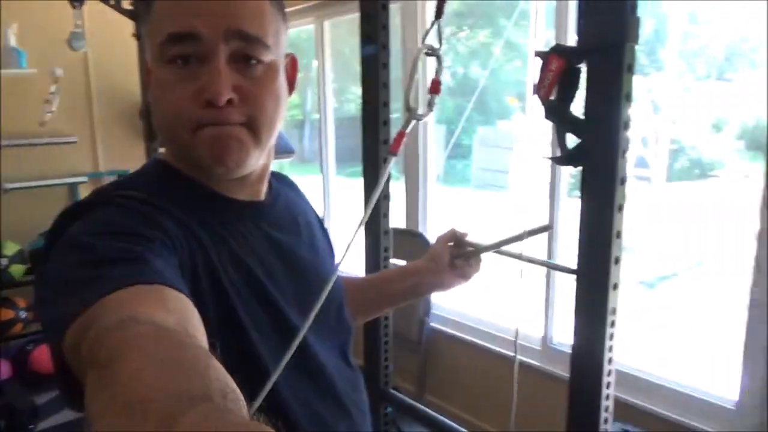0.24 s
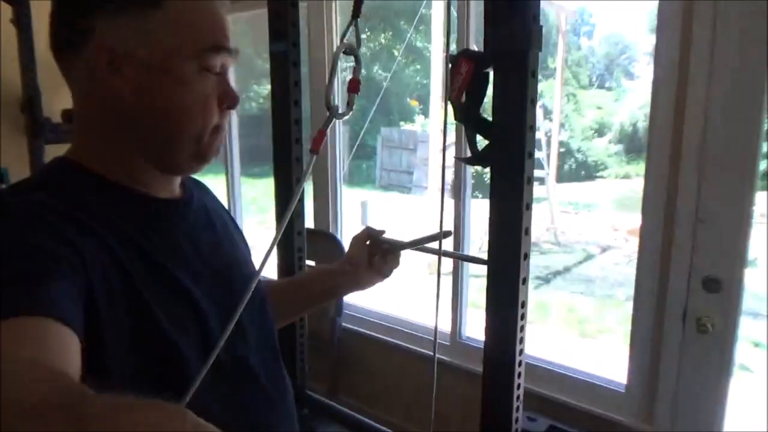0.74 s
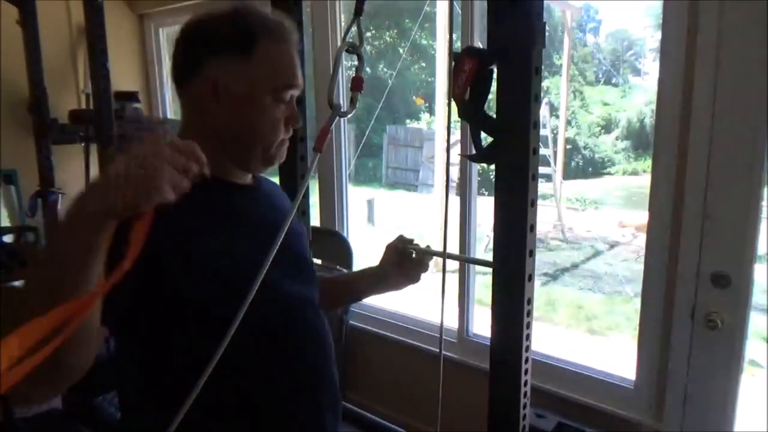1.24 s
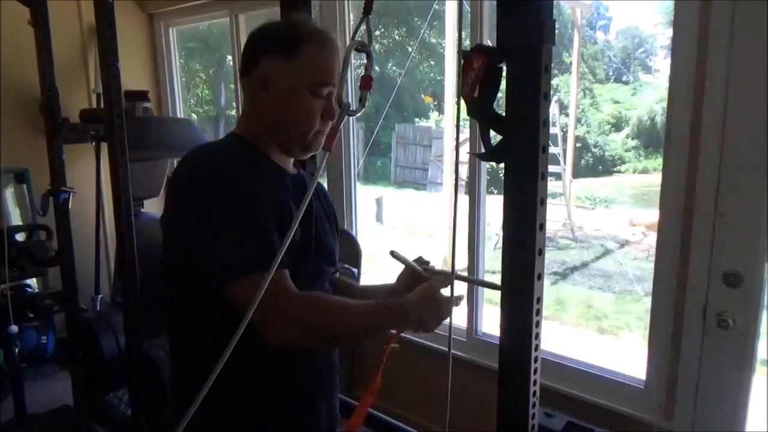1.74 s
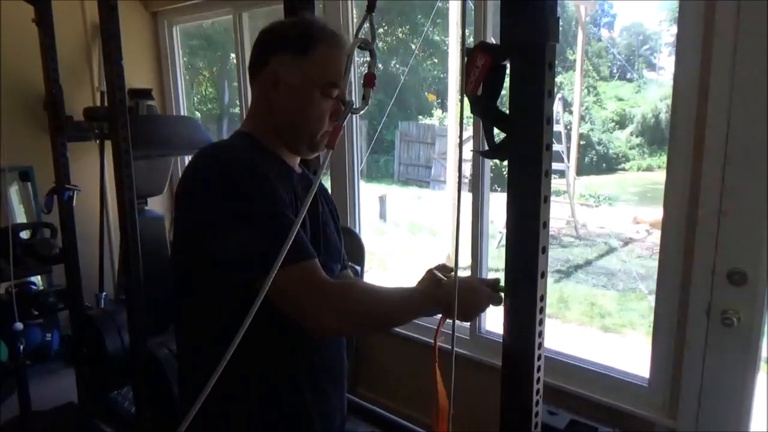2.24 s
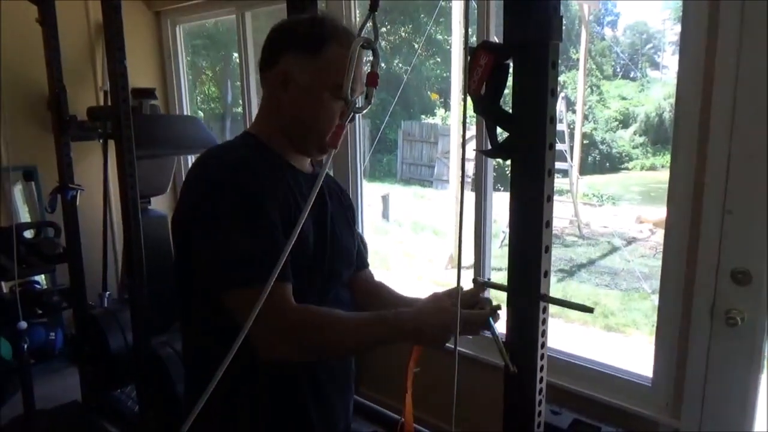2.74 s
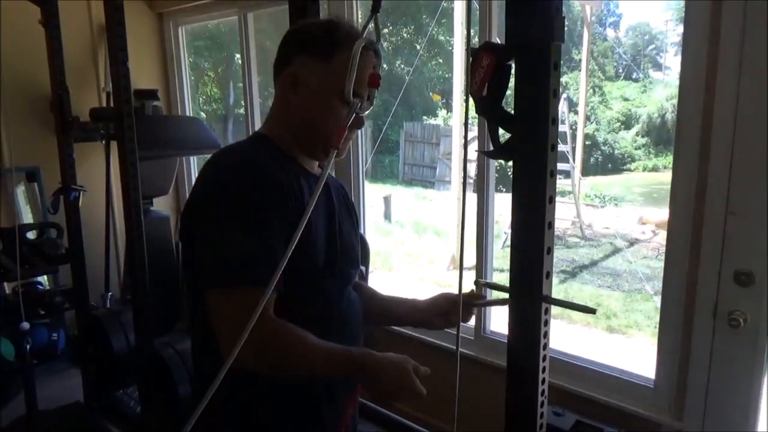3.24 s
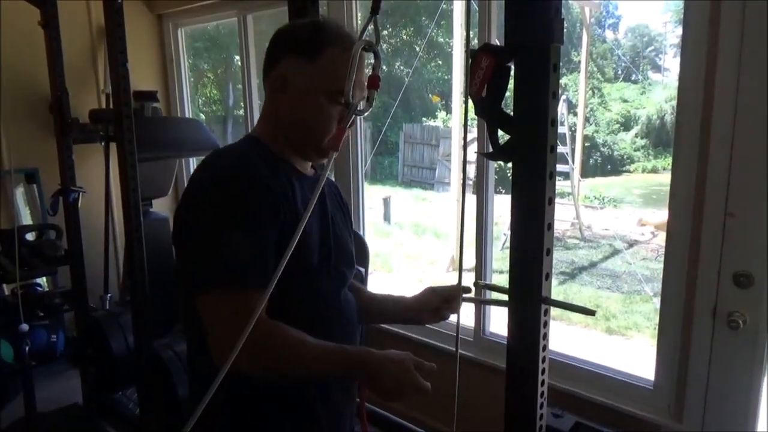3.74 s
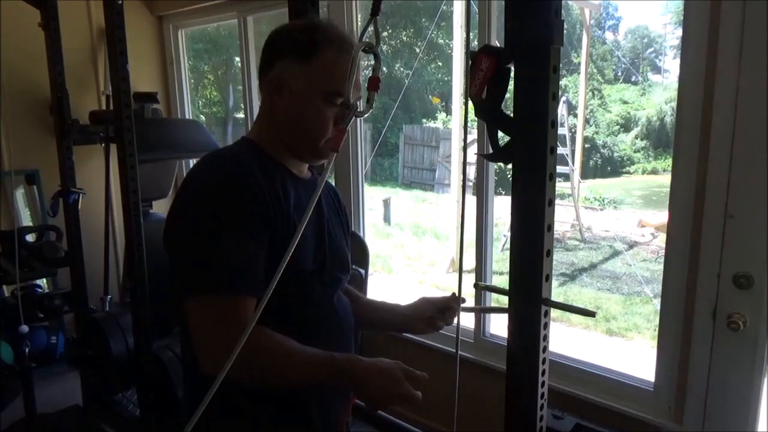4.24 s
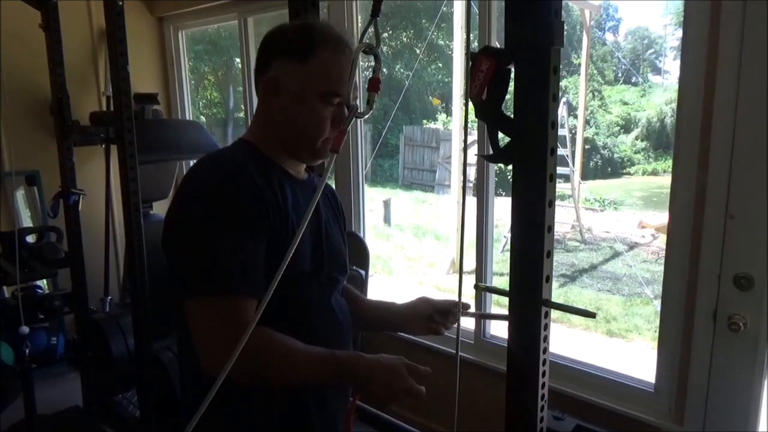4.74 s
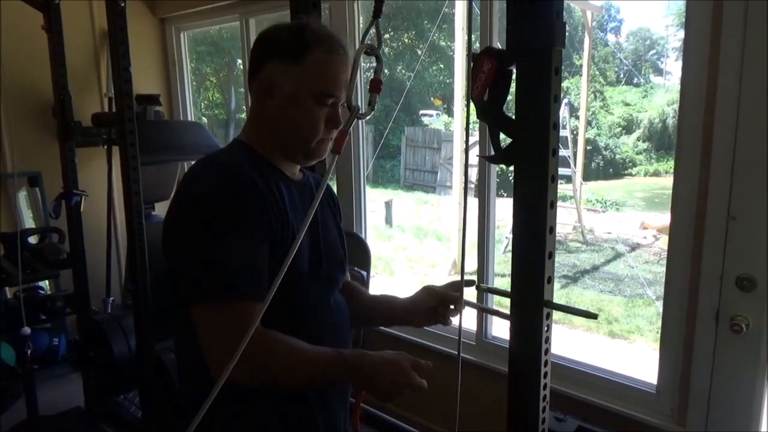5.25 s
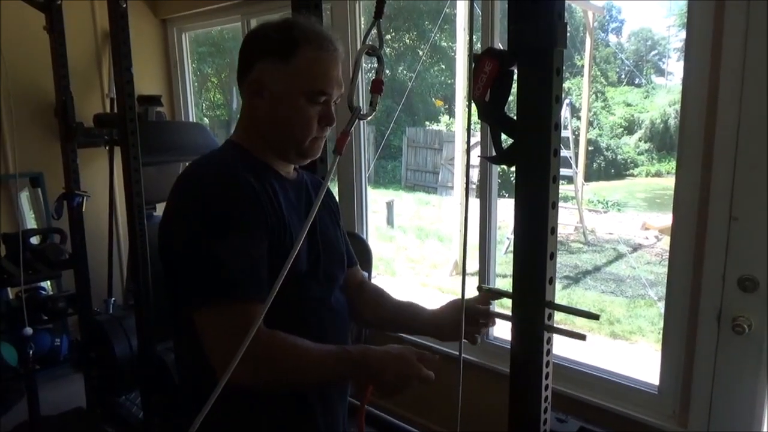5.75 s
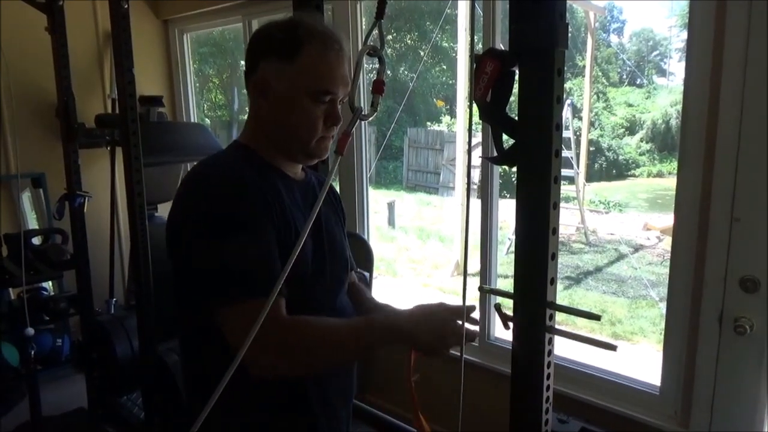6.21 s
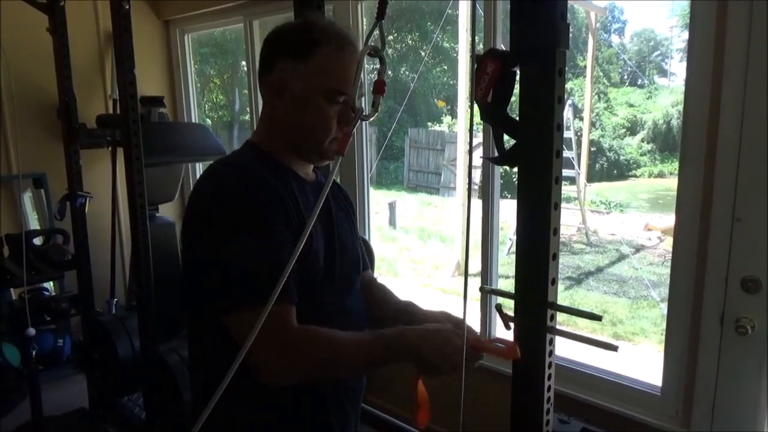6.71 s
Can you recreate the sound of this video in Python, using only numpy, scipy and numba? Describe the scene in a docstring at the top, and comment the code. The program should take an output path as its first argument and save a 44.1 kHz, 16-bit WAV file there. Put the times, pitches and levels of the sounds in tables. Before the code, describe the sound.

Low fan hum fills a hard-walled room. A double metal clank and a cluster of close, hollow plastic taps come first; then steel pegs strike and grate in the holes of a hollow rack post, one blow singing on with a high, pure ring. Clanks continue in small groups with gritty scrapes, thinning before six seconds, leaving light strap rustle and hum. The loudest hits sound squashed.

```python
"""A small, hard-walled gym hums with a low rush and two wavering fan tones; a nylon strap and sleeve brush in grains.
Steel pegs scrape along the holes of a hollow steel upright, in clumps of tiny slips that ring the steel.
From the first moments blows clank between scrapes: noise-driven wall modes plus decaying peg modes in the room.
Early on fingers click on a plastic case by the microphones; near three seconds a faint low tone bends up and back.
After the last blow and scrape the cloth brushes again over the hum. A limiter flattens the loudest sounds."""
import sys
import numpy as np
from scipy import signal
from scipy.fft import rfft, irfft
from scipy.io import wavfile
from scipy.ndimage import uniform_filter1d, minimum_filter1d
from numba import njit

SR = 44100
rng = np.random.default_rng(int(sys.argv[2]) if len(sys.argv) > 2 else 0)


def wav_record(signal):
    """Record a signal, one row per channel, as 16-bit PCM in the file named by sys.argv[1]."""
    frames = np.transpose(np.atleast_2d(signal))
    bounded = np.clip(frames, -1, 1)
    # unit amplitude maps onto the largest positive 16-bit level
    quanta = np.round(bounded * 32767).astype(np.int16)
    wavfile.write(sys.argv[1], SR, quanta)


N = 307576
TIME = np.arange(N) / SR  # seconds into the scene
AGE = TIME[:int(1.5 * SR)]  # seconds since a sound began

# Levels in all tables stand ahead of the limiter.
# Room rush, spectrum before its treble shelf: (frequency [Hz], relative density [dB])
RUSH_SPECTRUM = [(15, -34), (25, -17), (138, -1.5), (182, 1.5), (241, 3), (401, -7), (444, -2), (588, -12),
                 (651, -10), (930, -19), (1330, -17), (3080, -28.5), (4290, -68), (9200, -51), (11000, -43),
                 (14300, -68), (22000, -120)]
RUSH_DB = -44.5
# Wavering fan tones, of which the first two sound: (frequency [Hz], rms level [dB])
FAN_TONES = [(50, -65.5), (143, -57), (233, -52.5)]
# Reverberation of the gym: (frequency [Hz], time to fall 60 dB [s])
ROOM_T60 = [(200, 0.91), (1000, 0.57), (2000, 0.58), (5000, 0.48), (11000, 0.27)]

# Nylon strap and sleeve brushing: (start [s], length [s], level [dB])
BRUSHES = [(0.0, 0.12, -42.5), (0.725, 0.022, -44.5), (1.404, 0.24, -43.5), (6.09, 0.082, -49),
           (6.41, 0.049, -49.5), (6.7, 0.081, -54)]
# Hiss of the woven fibres: (frequency [Hz], relative density [dB])
CLOTH_SPECTRUM = [(600, 11.5), (2000, -1), (4000, 1), (7000, 1.5), (9500, 3.5), (11000, -2.5)]
BRUSH_RISE_S, BRUSH_FALL_SHARE = 0.045, 1  # swell time constant; fall time constant as a share of length
CLOTH_FLOOR_DB = -60  # steady faint hiss under and between brushes

# Pushes and pulls of a peg along its hole:
# (start [s], length [s], level before treble shelf [dB], treble shelf [dB])
SLIDES = [(0.0, 0.035, -54, -9), (1.0, 0.07, -40.5, -22), (2.045, 0.066, -28.5, -12),
          (2.352, 0.053, -20, -1), (2.467, 0.13, -35, 14.5), (3.62, 0.13, -36, 7.5),
          (3.786, 0.19, -42.5, 6), (4.495, 0.19, -42.5, -0.5), (4.782, 0.023, -27, 10),
          (4.935, 0.047, -33, 17), (5.272, 0.24, -37.5, -5), (5.58, 0.2, -33, 6.5),
          (5.734, 0.1, -32.5, 4.5), (5.874, 0.096, -29, -17), (6.002, 0.055, -34.5, 4.5)]
SLIDE_RISE_S, SLIDE_FALL_S = 0.029, 0.022  # time constants of the hand's push
# The hollow upright's crowd of wall modes: (frequency [Hz], relative density [dB])
UPRIGHT_SPECTRUM = [(100, -47), (350, -12), (700, -5), (1050, -6.5), (1450, -0.5), (1900, 3), (2500, -3),
                    (3300, -0.5), (4050, -8), (4900, -4.5), (5800, -6.5), (8000, -7.5), (9600, -12),
                    (11000, -21)]
# Bending modes of a free peg: (frequency [Hz], relative level [dB], time to fall 60 dB [s])
PEG_MODES = [(1784, -2, .25), (1792, 0, .3), (1820, -3, .8), (1855, -7, .3), (1928, -10, .2),
             (1981, -8, .7), (2799, -16, .15), (3698, -22, .4), (4296, -19, .1), (4910, -20, .1),
             (6530, -25, .15)]
# A peg that bears on the wall of its hole: (frequency [Hz], relative level [dB], time to fall 60 dB [s])
SEATED_MODES = [(1660, -10, .12), (1702, 0, .3), (1770, -8, .15), (1860, -12, .4), (1940, -13, .3),
                (2041, -9, .45), (2185, -12, .45), (2368, -11, .2), (4942, -19, .15), (5017, -22, .15),
                (5440, -27, 1.1), (7467, -20, .15), (8677, -25, .15), (10347, -29, .15)]
# Bright modes woken by a hard knock on the end: (frequency [Hz], relative level [dB], time to fall 60 dB [s])
CHIME_MODES = [(1389, -23, .4), (2713, -14, .15), (3601, 0, .3), (3704, -8, .15), (3790, -10, .12),
               (4261, -11, .1), (4820, -10, .1), (4950, -9, .12), (7005, -13, .15), (10610, -26, .1)]
# A peg left hanging free sings on: (frequency [Hz], relative level [dB], time to fall 60 dB [s])
FREE_NOTE = [(3601, 0, 1.25)]

# Steel on steel; the ring columns are relative to the blow's level and scatter from mode to mode:
# (time [s], level [dB], bass shelf [dB], treble shelf [dB], contact resonance [Hz],
#  peg ring [dB], seated-peg ring [dB], chime [dB])
BLOWS = [(0.044, -16.5, -7, 3, 4650, 3, -37, -16), (0.097, -21.5, -8, -3.5, 3000, 6, -24, -24),
         (0.742, -40, 5, -30, 1740, 2.5, -3.5, -36), (1.252, -19.5, -11.5, 3, 4830, -10.5, -16, -31),
         (1.748, -20, 2.5, -0.5, 900, 6.5, 0.5, -22), (1.776, -21, 8.5, -3, 1960, -2.5, -4.5, -10.5),
         (2.199, -21.5, -9.5, -12, 5100, -17, -3, 2), (2.286, -6.5, -0.5, 4.5, 2720, -3.5, -9, -24),
         (2.624, -28.5, 2.5, -10, 1280, -13, -9, -3.5), (2.651, -24.5, 7, -9.5, 1592, -15.5, -8, -14),
         (3.157, -1, -21, 5.5, 4570, -18, -36, -3.5), (3.665, -16.5, -10, -6.5, 3330, -7, -8.5, -1.5),
         (3.714, -24, -54, -11, 1780, 4, -14, -8), (4.242, -36.5, 20, 10, 1930, -6.5, 3.5, -26),
         (4.548, -40, -6, -21, 1700, -26, -0.5, -11), (4.728, -43.5, -15, -7, 1900, 13, 8, -32),
         (4.866, -15.5, 6, 10, 2670, -16, 1.5, -34), (4.933, -22.5, 4.5, -20, 2550, -18, 2.5, -28),
         (5.114, -24.5, -4, -8, 4070, -10, -15, -19), (5.461, -21, -8.5, -9, 3780, -14, -13, -2.5),
         (5.679, -32, 2, -34, 2940, -4, -8, -11), (5.864, -35, 11, -6, 1790, 3.5, 7.5, -22)]
# Blows after which a peg hangs free and sings on: (time [s], level [dB])
FREE_RINGS = [(0.044, -31), (1.252, -19)]
CONTACT_LIFT_DB = 6.5  # how far a blow favours the wall modes near its contact resonance
HELD_NOTE_DB = -22  # the pure note under the chime, while a hand holds the peg

# Fingers on the plastic case: (time [s], level [dB], treble shelf [dB])
TAPS = [(0.185, -15, 1), (0.229, -23.5, -22), (0.304, -30.5, -16), (0.401, -26.5, 12), (0.461, -34, -2),
        (0.542, -14.5, 7.5), (0.557, -18.5, -19), (0.585, -31, -16), (0.648, -28.5, 17), (0.699, -14, 5.5),
        (0.787, -34.5, -32), (0.994, -29, -8), (1.034, -27, -8), (1.081, -33.5, -18)]
# Click of the case: (frequency [Hz], relative density [dB])
CASE_SPECTRUM = [(150, -34), (350, -9), (550, 4), (900, 4), (1400, 0.5), (1900, 4.5), (2400, 1),
                 (3000, -0.5), (3900, -13.5), (5200, -11), (8000, -22.5), (11000, -31)]
# Hollow knock of the case: (frequency [Hz], bandwidth [Hz], relative level [dB])
CASE_MODES = [(533, 10.4, 0), (780, 23, -2), (1347, 58, -0.5)]


def undb(db):
    """Decibels to gain."""
    return 10 ** (np.asarray(db) / 20)


def unit(x):
    """Scale to an rms of one."""
    return x / np.sqrt(np.mean(x ** 2))


def burst(x, seconds):
    """Scale a stereo ring to the energy of a unit signal that lasts so long."""
    return x * np.sqrt(2 * seconds * SR / np.sum(x ** 2))


def add(out, start, x):
    """Mix x into out from a start time in seconds."""
    i = int(start * SR)
    out[:, i:i + x.shape[1]] += x[:, :N - i]


def at_hz(points, hz):
    """Read (Hz, value) points on a log-frequency axis."""
    f, value = np.transpose(points)
    return np.interp(np.log(hz + 1), np.log(f), value)


def colour(x, points, bass_db=0, treble_db=0, bass_hz=1150, treble_hz=4800):
    """Shape by a spectrum and two shelves, in minimum phase so that attacks stay sharp."""
    size = 4096
    hz = np.arange(size // 2 + 1) * SR / size
    bass = bass_db / (1 + (hz / bass_hz) ** 4)
    treble = treble_db * (1 - 1 / (1 + (hz / treble_hz) ** 4))
    cepstrum = irfft(np.log(undb(at_hz(points, hz) + bass + treble)))
    # folding the cepstrum forward makes the filter causal
    cepstrum[1:size // 2] *= 2
    cepstrum[size // 2 + 1:] = 0
    impulse = irfft(np.exp(rfft(cepstrum)))
    return signal.oaconvolve(x, impulse[None], axes=1)[:, :x.shape[1]]


def high_pass(x, hz):
    """Roll off what lies below hz."""
    return signal.sosfilt(signal.butter(2, hz, "high", fs=SR, output="sos"), x)


def fade(t60):
    """Exponential decay that falls 60 dB in t60 seconds."""
    return np.exp(-np.log(1000) * AGE / t60)


def stroke(start, length, rise_s, fall_s):
    """One move of a hand: it swells, holds for its length and eases off."""
    before = np.minimum(TIME - start, 0)
    after = np.maximum(TIME - start - length, 0)
    return np.exp(before / rise_s - after / fall_s)


def noise(size):
    """Two unrelated white noises."""
    return rng.standard_normal((2, size))


def spread(pair, side_db=-9):
    """Two unrelated signals, as middle and side, make a diffuse sound at two close microphones."""
    return pair[0] + undb(side_db) * pair[1] * np.array([[1], [-1]])


def room_hum(hiss_db=-6):
    """Steady ventilation: a low rush, much alike at both microphones, and two fan tones of drifting phase."""
    mid, side = colour(noise(N), RUSH_SPECTRUM, treble_db=hiss_db)
    # the side signal is held down most in the low range
    side = colour(side[None], [(100, -21.0), (300, -26.0), (600, -5)])[0]
    hum = undb(RUSH_DB) * unit(spread((mid, side), side_db=-4))
    wavers = noise(N).cumsum(axis=1) * 0.0109  # two random walks of phase, in radians
    # the first two tones each take one waver, shared by both channels; the third stays silent
    return hum + sum(undb(db) * np.sqrt(2) * np.sin(2 * np.pi * hz * TIME + waver)
                     for (hz, db), waver in zip(FAN_TONES, wavers))


def rustle(grain_db=3):
    """Woven fibres brushing: a hiss in grains of about a millisecond, scattered in level."""
    grain_samples = 64
    grain_gains = undb(grain_db * rng.standard_normal(N // grain_samples + 1))
    grains = np.repeat(grain_gains, grain_samples)[:N]
    motion = undb(CLOTH_FLOOR_DB)
    for start, length, db in BRUSHES:
        motion = motion + undb(db) * stroke(start, length, BRUSH_RISE_S, BRUSH_FALL_SHARE * length)
    return unit(colour(spread(noise(N)) * grains, CLOTH_SPECTRUM)) * motion


def die_away(x):
    """Let each band fade at the room's rate."""
    hz = np.arange(len(AGE) // 2 + 1) * SR / len(AGE)
    centres, t60s = np.transpose(ROOM_T60)
    spectrum = rfft(x)
    out = 0
    # overlapping bands that crossfade from one centre to the next
    for share, t60 in zip(np.eye(len(t60s)), t60s):
        band = irfft(spectrum * at_hz(np.c_[centres, share], hz))
        out = out + band * fade(t60)
    return out


def ringing(modes, direct):
    """Each decaying mode arrives at once, then swells and beats as the walls return it."""
    room = burst(die_away(spread(noise(len(AGE)))), 1 / SR)
    room[:, 0] += direct
    sizes = undb(np.array(modes)[:, 1])
    sizes = sizes / np.linalg.norm(sizes)
    rings = []
    for (hz, _, t60), size in zip(modes, sizes):
        tone = np.sin(2 * np.pi * hz * AGE) * fade(t60)
        ring = signal.fftconvolve(room, tone[None], axes=1)[:, :len(AGE)]
        rings.append(burst(ring, 0.064) * size)
    return np.array(rings)


def clang(wall_modes, wash_db=-6, crack_db=-1, crack_t60=0.017):
    """The upright's dense modes, a short crack of contact, and the wash that they leave in the room."""
    phases = np.exp(2j * np.pi * rng.random((2, len(wall_modes))))
    lines = unit(irfft(wall_modes * phases))
    wash = undb(wash_db) * noise(len(AGE))
    crack = undb(crack_db) * fade(crack_t60) * spread(noise(len(AGE)), side_db=-33.0)
    return die_away(spread(lines + wash)) + crack


def scrape(wall_modes, rings, slips_per_s=450, peg_db=-8, seated_db=0, chime_db=-16,
           uneven_db=5, judder_db=4.0, judder_per_s=45):
    """A sliding peg catches and slips in tiny knocks, which ring the same steel as the blows."""
    slips = (rng.random(N) < slips_per_s / SR) * rng.choice([-1, 1], N)
    slips = slips * undb(uneven_db * rng.standard_normal(N))
    # the peg binds and frees itself, so the slips come in clumps
    judder = rng.standard_normal(N)[(TIME * judder_per_s).astype(int)]
    slips = unit(slips * undb(judder_db * judder))
    edge = signal.sosfilt(signal.butter(1, 5000, "high", fs=SR, output="sos"), slips)
    force = np.zeros(N)
    for start, length, db, treble_db in SLIDES:
        push = undb(db) * stroke(start, length, SLIDE_RISE_S, SLIDE_FALL_S)
        force += push * (slips + edge * (undb(treble_db) - 1))
    # what one slip sets ringing: upright first, then the pegs
    walls = clang(wall_modes, wash_db=-5, crack_db=-30)
    body = burst(colour(walls, UPRIGHT_SPECTRUM, bass_db=8.5, treble_db=1.5), 0.059)
    for modes, share_db in zip(rings, (peg_db, seated_db, chime_db)):
        body = body + undb(share_db) * modes.sum(axis=0)
    return signal.fftconvolve(force[None], burst(body, 1 / SR), axes=1)[:, :N]


def blows(wall_modes, rings, scatter_db=2.5, contact_q=7):
    """Every blow lands on another spot and so wakes the modes in its own proportions."""
    out = np.zeros((2, N))
    for start, db, bass_db, treble_db, contact_hz, peg_db, seated_db, chime_db in BLOWS:
        hit = colour(clang(wall_modes), UPRIGHT_SPECTRUM, bass_db, treble_db)
        # the peg's free length stresses one group of wall modes
        contact = signal.lfilter(*signal.iirpeak(contact_hz, contact_q, fs=SR), hit)
        hit = burst(hit + (undb(CONTACT_LIFT_DB) - 1) * contact, 0.1)
        for modes, share_db in zip(rings, (peg_db, seated_db, chime_db, chime_db + HELD_NOTE_DB)):
            weights = undb(share_db + scatter_db * rng.standard_normal(len(modes)))
            hit = hit + np.tensordot(weights, modes, 1)
        add(out, start, undb(db) * hit)
    for start, db in FREE_RINGS:
        add(out, start, undb(db) * rings[-1].sum(axis=0))
    return out


def taps(case_t60=0.03, room_db=-25, room_t60=0.87, knock_db=8):
    """Dry plastic clicks right at the microphones: noise bursts, a resonant hollow knock, a faint tail."""
    out = np.zeros((2, N))
    for start, db, treble_db in TAPS:
        decay = fade(case_t60) + undb(room_db) * fade(room_t60)
        click = spread(noise(len(AGE)), side_db=-7) * decay
        knock = sum(undb(mode_db) * signal.lfilter(*signal.iirpeak(hz, hz / width, fs=SR), click)
                    for hz, width, mode_db in CASE_MODES)
        tap = colour(click + undb(knock_db) * knock, CASE_SPECTRUM, treble_db=treble_db)
        add(out, start, undb(db) * burst(tap, 0.0032))
    return out


def groan(start=2.91, length=0.18, hz=375, bend_hz=28, db=-44):
    """A faint low sine whose pitch and level arch up and back together."""
    arch = np.sin(np.pi * np.clip((TIME - start) / length, 0, 1))
    phase = 2 * np.pi * np.cumsum(hz + bend_hz * arch) / SR
    return undb(db) * arch * np.sin(phase)


def scene(modes_per_hz=.055, mode_scatter_db=2.4, rings_low_cut_hz=1000):
    """One upright and its pegs serve all blows and scrapes; the peg rings carry little below about 1 kHz."""
    size = len(AGE) // 2 + 1
    present = rng.random(size) < modes_per_hz * SR / len(AGE)
    wall_modes = present * undb(mode_scatter_db * rng.standard_normal(size))
    rings = [ringing(PEG_MODES, direct=0.32), ringing(SEATED_MODES, direct=0.54),
             ringing(CHIME_MODES, direct=1.54), ringing(FREE_NOTE, direct=3.8)]
    rings = [high_pass(modes, rings_low_cut_hz) for modes in rings]
    steel = scrape(wall_modes, rings) + blows(wall_modes, rings)
    return room_hum() + rustle() + steel + taps() + groan()


@njit
def follow(x, release):
    """Jump to each peak and sink back slowly."""
    out, level = np.empty(len(x)), 0.
    for i in range(len(x)):
        level = max(x[i], level * release)
        out[i] = level
    return out


def record(dry, ceiling_db=-14.5, release_s=0.04):
    """A limiter turns everything down while the envelope tops its ceiling; a steep filter cuts the top."""
    power = uniform_filter1d(np.mean(dry ** 2, axis=0), size=100)
    envelope = follow(np.sqrt(np.abs(power)), np.exp(-1 / (release_s * SR)))
    gain = 1 / np.maximum(1, envelope / undb(ceiling_db))
    # look a little ahead, then smooth the gain
    gain = uniform_filter1d(minimum_filter1d(gain, size=100), size=100)
    top_cut = signal.ellip(10, .2, 70, 11050, fs=SR, output="sos")  # ripple dB, stopband dB, edge Hz
    return signal.sosfilt(top_cut, dry * gain)


dry = scene()
out = record(dry)
wav_record(out)
```